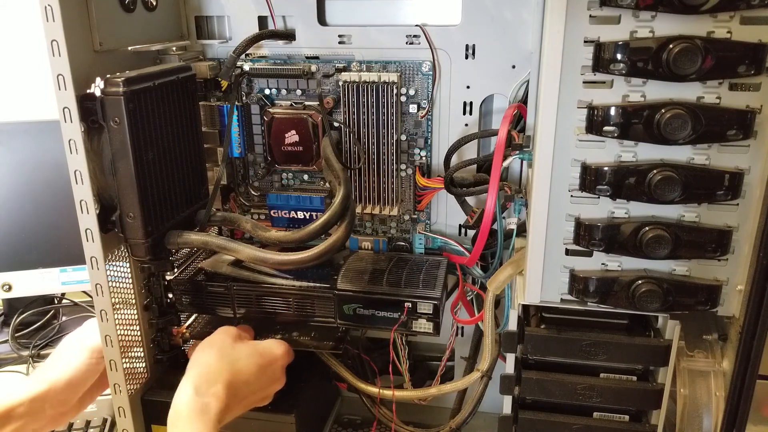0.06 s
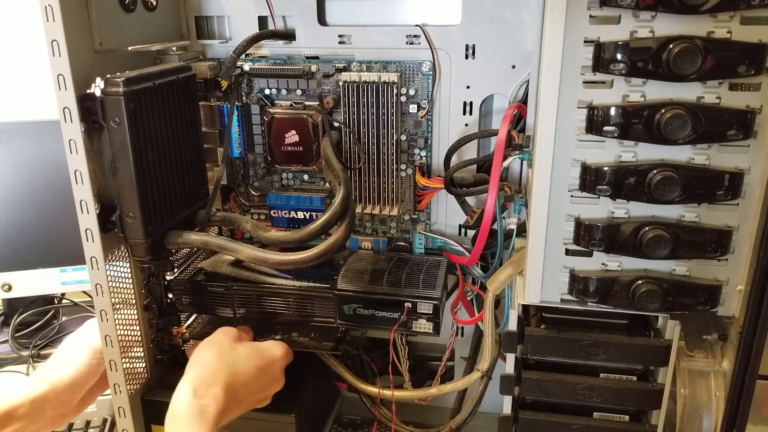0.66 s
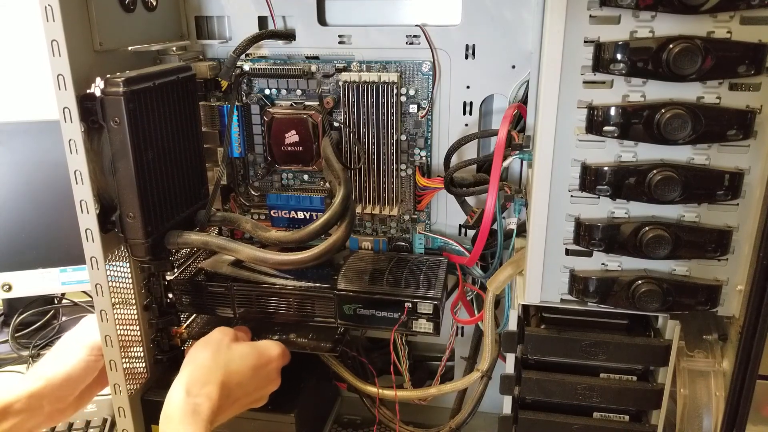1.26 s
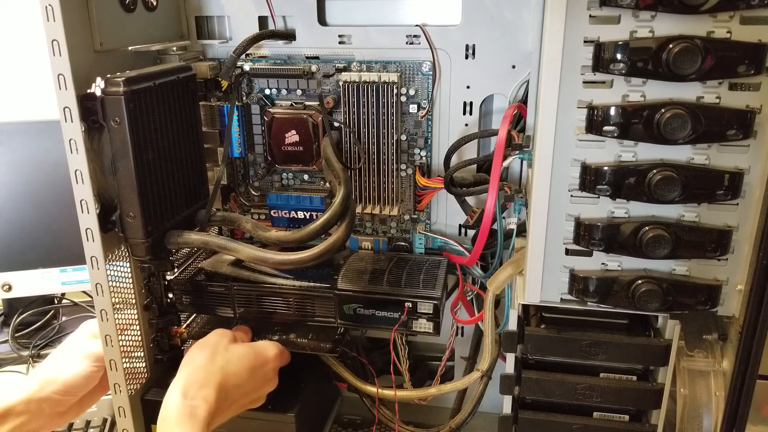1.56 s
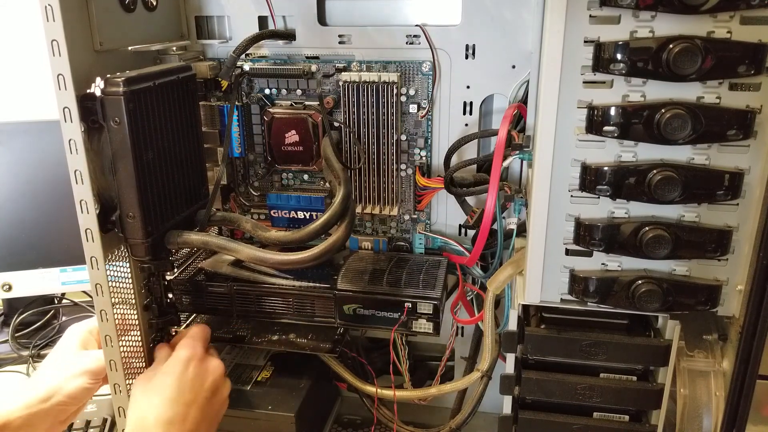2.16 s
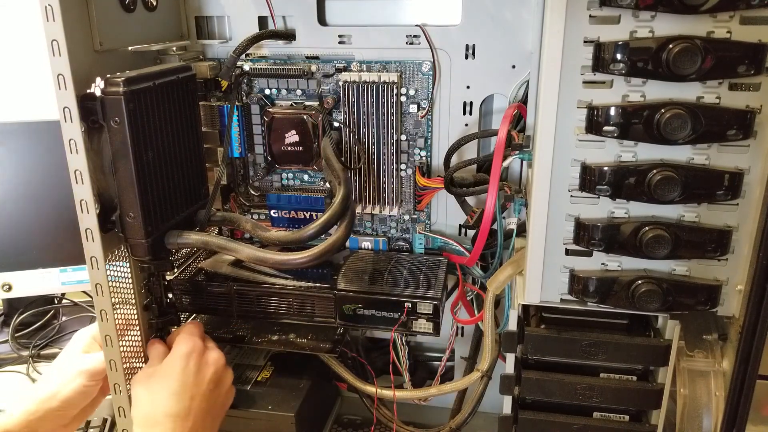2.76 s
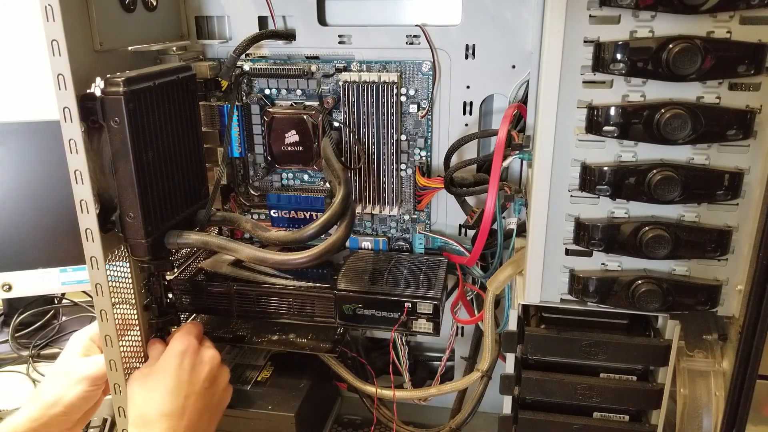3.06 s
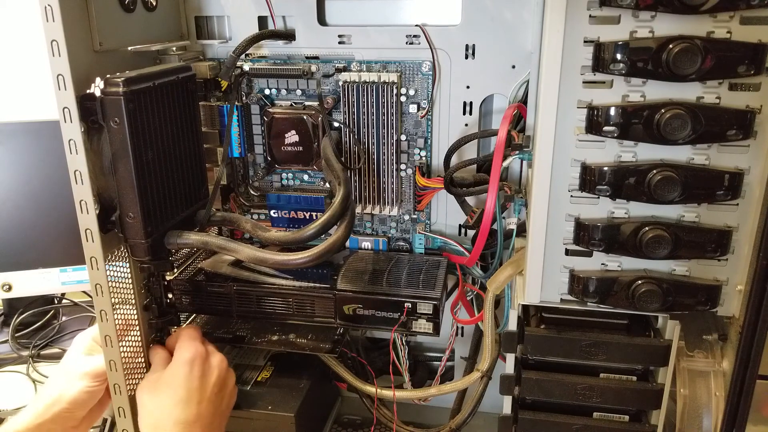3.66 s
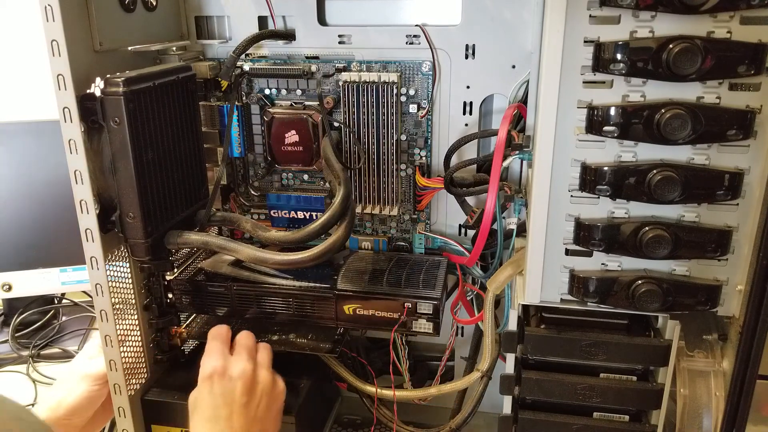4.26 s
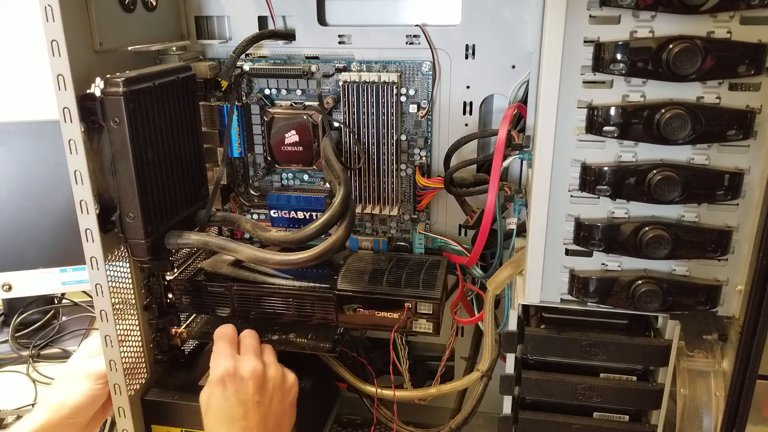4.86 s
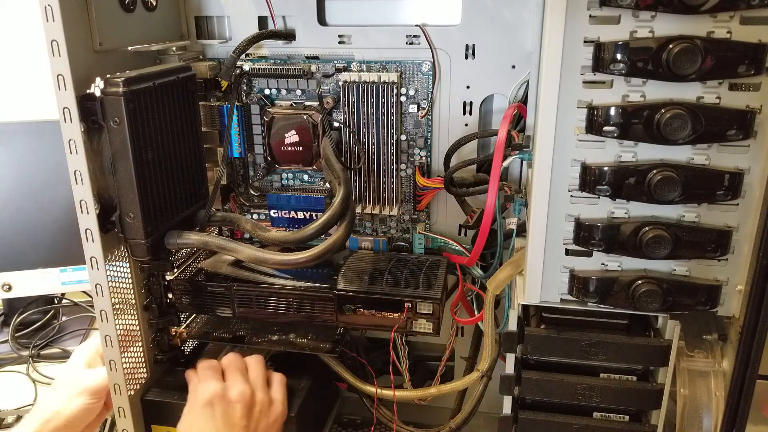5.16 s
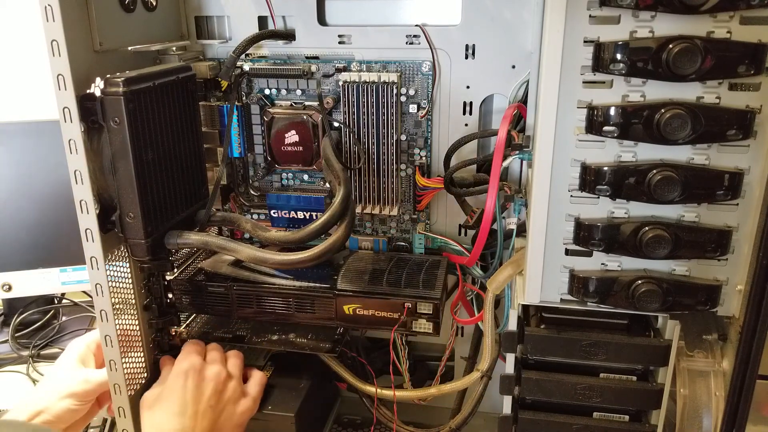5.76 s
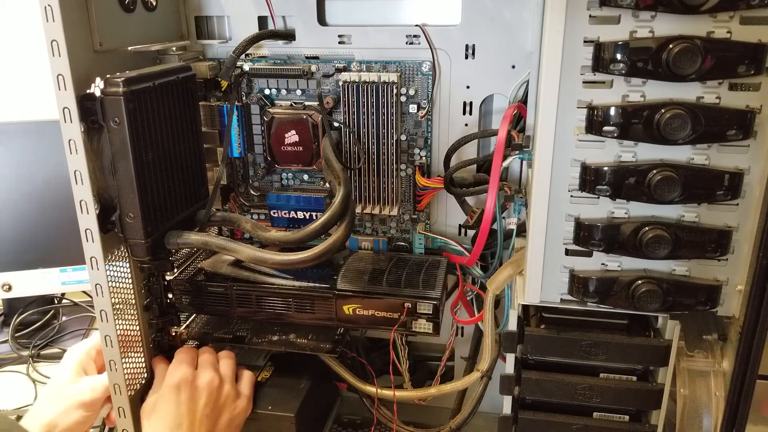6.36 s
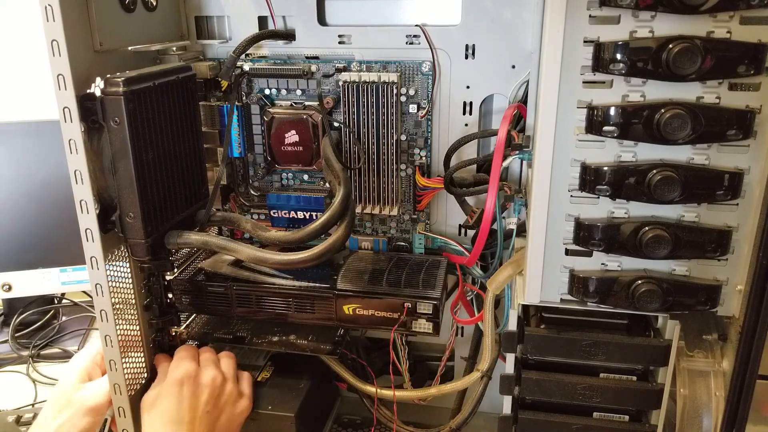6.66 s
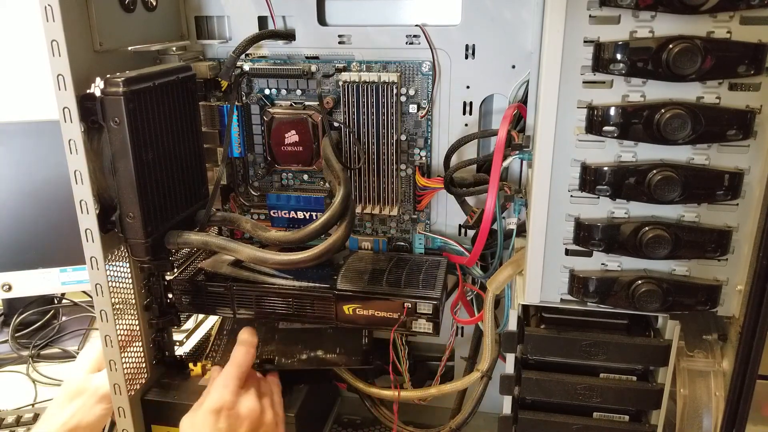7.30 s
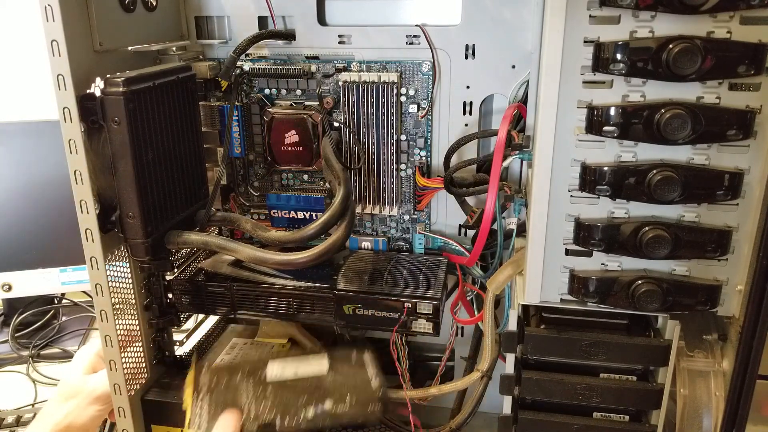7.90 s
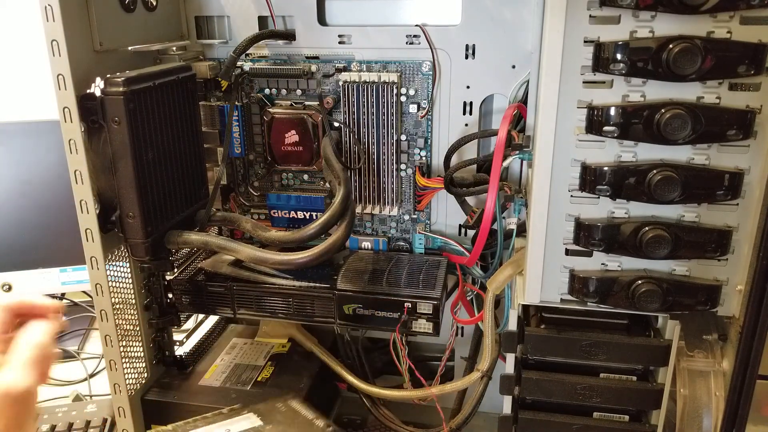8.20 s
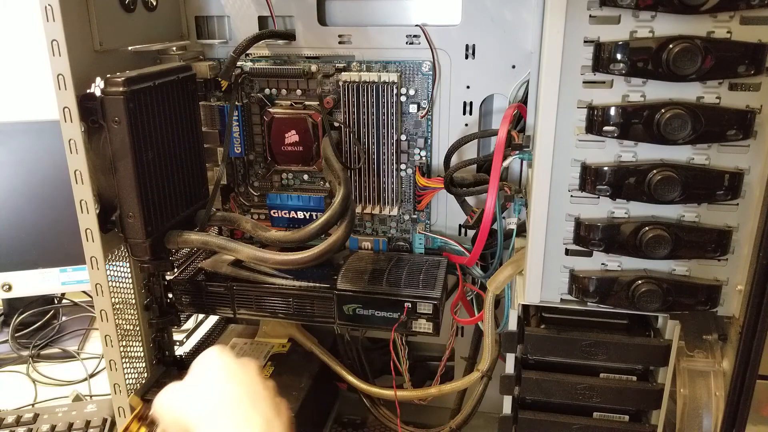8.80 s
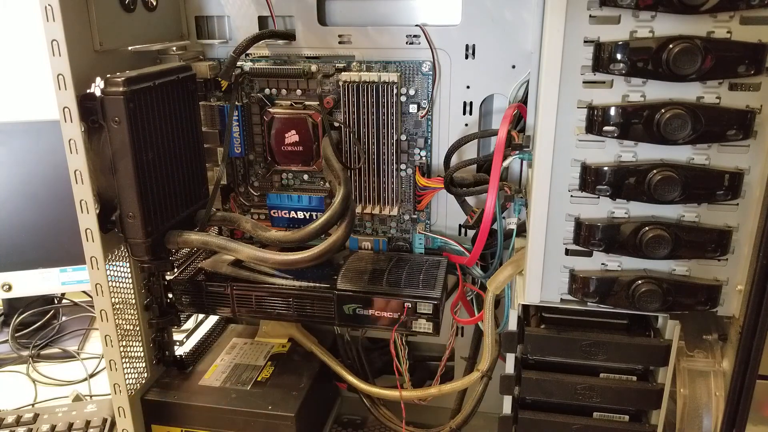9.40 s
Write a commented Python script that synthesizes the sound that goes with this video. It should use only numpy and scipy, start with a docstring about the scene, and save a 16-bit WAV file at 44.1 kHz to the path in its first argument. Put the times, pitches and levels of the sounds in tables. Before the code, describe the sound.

Hands unscrew and pull a card from a metal computer case, with light scrapes, knocks and clacks over a low hum in a quiet room.

```python
"""An open steel computer case in a small, quiet room, on a close pair of microphones, hands a little left.
First a screw rasps round in six twists and the expansion card knocks. Fingers then rub on its bracket
and plastic shroud. Near 7 s the card slides from its slot, the case clanks, the bracket scrapes and the
card knocks on its way out; plastic clacks come last. Each contact rings the part and the room, and a
longer, softer one loses treble. A fan hums low throughout, over moving air and microphone hiss."""
import sys
import numpy as np
from scipy import signal
from scipy.fft import rfft, irfft
from scipy.io import wavfile
from scipy.ndimage import uniform_filter1d

SR = 44100
rng = np.random.default_rng(int(sys.argv[2]) if len(sys.argv) > 2 else 0)


def store_pcm(level_fs):
    """Save levels as 16-bit WAV."""
    pcm = np.round(np.clip(level_fs, -1, 1) * 32767).astype(np.int16)
    wavfile.write(sys.argv[1], SR, np.atleast_2d(pcm).T)


N = 420713

# blows on steel case, card and plastic parts: (time [s], level [dB], contact time [ms], extra thud [dB])
CASE_BLOWS = [(6.0005, -41, 0.025, -2), (6.014, -41, 0.55, 8), (6.783, -28.5, 0.16, -6),
              (6.7905, -42, 0.055, 5.5)]
CARD_KNOCKS = [(0.7975, -41.5, 0.15, 0), (0.8055, -38, 0.76, 5.5), (0.862, -56.5, 0.89, 22),
               (1.079, -56, 2.8, 4), (2.213, -60, .5, 9), (5.824, -60.5, 1.6, 9), (6.252, -56, 1.3, -8),
               (7.1335, -33, 0.35, -9), (7.1795, -44.5, 0.11, 7), (7.232, -51.5, 0.1, 11.5),
               (7.638, -52, 0.098, 8), (8.9, -66.5, 0.79, 4)]
PLASTIC_CLACKS = [(2.035, -55.5, 0.25, -6), (5.6445, -43, 0.1, -12), (9.464, -53, 0.044, 12.5),
                  (9.533, -42.5, 0.33, 16)]
# taps on the card's metal bracket: (time [s], level [dB], contact time [ms])
BRACKET_TAPS = [(1.978, -62.5, .03), (2.168, -69, .05), (5.728, -62, 0.16), (6.515, -82, .1),
                (7.071, -48, 0.049), (8.036, -72, 0.29), (8.089, -73, .12), (8.612, -63, 0.097)]
# thin ticks under the fingers: (time [s], level [dB])
TICKS = [(2.484, -80), (8.006, -78), (8.337, -65), (8.344, -57.5), (8.381, -69.5)]
# screw twists, rubs on case and shroud: (time [s], length [s], level [dB], contact time [ms])
SCREW_TWISTS = [(0.008, 0.038, -56.5, 0.16), (0.153, 0.045, -54, 0.15), (0.319, 0.035, -57.5, 0.25),
                (0.467, 0.04, -63.5, 0.19), (0.598, .044, -57, 0.17), (0.712, .068, -58.5, 0.22)]
CASE_RUBS = [(1.52, 0.12, -61, 0.21), (1.65, 0.19, -62.5, 0.15), (1.88, 0.13, -73, 0.063),
             (1.99, 0.043, -55, 0.11), (2.125, 0.11, -62.5, 0.14), (2.23, 0.22, -72, 0.14),
             (5.83, 0.046, -73, 0.048), (6.368, .018, -67.5, .04), (7.605, 0.018, -65.5, .05)]
SHROUD_RUBS = [(2.62, 0.065, -64, 0.13), (4.24, 0.045, -67, 0.058), (4.925, 0.11, -65.5, 0.12),
               (5.105, 0.1, -60, 0.11), (8.607, .025, -64, .06)]
# connector leaving its slot, bracket dragging, skin brushing: (time [s], length [s], level [dB])
SLOT_SLIDE = [(6.721, 0.048, -37.5)]
BRACKET_SCRAPE = [(7.072, 0.025, -42.5)]
SWISHES = [(1.735, 0.048, -70), (2.125, 0.038, -70), (2.478, 0.021, -74), (3.79, 0.032, -74.5),
           (3.87, 0.081, -76), (4.2, 0.03, -83.5), (5.24, 0.13, -81), (5.41, 0.11, -79), (7.28, 0.27, -78),
           (8.0, 0.056, -80.5), (8.175, 0.044, -73), (8.56, 0.022, -77)]
# ringing modes of each part: (frequency [Hz], level [dB], t60 [s])
CASE_MODES = [(444, -11, .26), (480, -17, 0.18), (521.4, -3.5, .2), (913, -9.5, .2), (1199, -10, .15),
              (1664, -16, 0.34), (1778, -9.5, 0.067), (2050, -13, 0.28), (2420, -16.5, 0.086),
              (2710, -9.5, 0.14), (2994, -12, .2), (3760, -7, .24), (4810, -11, .2), (6600, -13.5, 0.18),
              (6760, -13, 0.25)]
CARD_MODES = [(107.5, -19.5, .2), (183.3, -13, .18), (403, -8.5, .14), (478, -6.5, .12), (570, -1.5, 0.15),
              (811, -7, 0.11), (940, -8, 0.14), (1124, -13.5, 0.23)]
SLOT_MODES = [(2100, -16, .05), (3782, -14, .1), (5030, -10, .1), (8350, -5, .12), (13400, -5, .1),
              (14070, -1, .13)]
BRACKET_MODES = [(1500, -10, .06), (2342, -2, .13), (3620, 1, .13), (4670, -12, .08), (6650, -6, .06),
                 (10100, -12, .06)]
PLASTIC_MODES = [(517, -7.5, 0.14), (810, -9, 0.21), (1190, -7.5, 0.16), (1280, 0, 0.2), (1480, -3.5, .18),
                 (1522, -7, 0.093), (2460, -13.5, 0.26), (2560, -19, 0.094)]
PANEL_MODES = [(451.2, -13.5, 0.073), (735, -11.5, 0.017), (1928, -0.5, 0.021), (2850, -6, 0.056),
               (3110, -18, 0.054), (2292, -8.5, 0.026), (3680, -7, .07), (4157, -5.5, 0.051),
               (4390, -4, .05), (4775, -7, 0.033), (5550, -5.5, 0.046), (7070, -10, 0.062)]
SHROUD_MODES = [(647, -1.5, 0.081), (800, -3.5, .12), (988, -8, 0.086), (1404, -6, 0.077),
                (2900, -4, 0.082), (7200, -15, .06), (9840, 8, 0.055)]
# edges of the thud, body, clack, click and tick bands: (frequency [Hz])
BAND_EDGES = [70, 300, 1000, 3200, 8000, 15800]
# tone of each kind of contact: (thud [dB], body [dB], clack [dB], click [dB], tick [dB])
CASE_TONE = (-13, 1.5, 7, 4.5, 6)
CARD_TONE = (-8.5, 1.5, -4.5, -9.5, -7)
SLIDE_TONE = (-8, -6, 0, 1, -1)
BRACKET_TONE = (-16.5, -4.5, -0.5, 2.5, -4)
SCRAPE_TONE = (-20, -9.5, 5, -5.5, -10)
PLASTIC_TONE = (-13, -4.5, 0.5, -16, -19.5)
SCREW_TONE = (-1.5, 1.5, -1.5, -6.5, -1)
RUB_TONE = (-13, -1, 0, -4, -3.5)
SHROUD_TONE = (-13, -0.5, -6.5, -10.5, -4)
SWISH_TONE = (-17, -12.5, -2, 2.5, 6)
TICK_TONE = (-30, -37, -12, -0.5, 3.5)
# fan hum: (harmonic [multiple of the shaft rate], level [dB])
FAN_HARMONICS = [(3, -66.5), (4, -65), (5, -60.5), (6, -60), (9, -76), (10, -69), (13, -76), (14, -75.5),
                 (16, -81.5), (18, -79.5)]
# moving air and microphone hiss: (frequency [Hz], level [dB per Hz])
AIR_SPECTRUM = [(20, -88.5), (50, -88.5), (85, -83.5), (150, -84.5), (230, -89.5), (320, -92.5), (480, -94),
                (640, -103), (1000, -113), (2000, -117.5), (5000, -120), (8500, -119), (13000, -113.5),
                (16000, -113.5)]

RING_SAMPLES = 32768
LEFT_RIGHT = np.array([[1], [-1]])


def case_clanks():
    """The steel case rings when struck, loudest as the card snaps free."""
    return blows(CASE_BLOWS, CASE_TONE, CASE_MODES, crack_db=4, ring_db=-7.5, t60=.28)


def card_knocks():
    """The card bumps on its way out; its low modes make a duller knock."""
    return blows(CARD_KNOCKS, CARD_TONE, CARD_MODES, crack_db=3, ring_db=-6.5, t60=.24)


def slot_slide():
    """The edge connector leaves its slot in a burst of very uneven slips."""
    return strokes(SLOT_SLIDE, SLIDE_TONE, SLOT_MODES, ring_db=-4.5, t60=.11,
                   slips_per_s=1300, uneven_db=11, hiss=.12, swell=.14)


def bracket():
    """The metal bracket rings under light taps and drags once along the case."""
    taps = blows(BRACKET_TAPS, BRACKET_TONE, BRACKET_MODES, crack_db=4, ring_db=-6, t60=.25)
    scrape = strokes(BRACKET_SCRAPE, SCRAPE_TONE, BRACKET_MODES, ring_db=5, t60=.26,
                     slips_per_s=2200, uneven_db=4, hiss=.14, swell=.1)
    return taps + scrape


def plastic_clacks():
    """The card's plastic parts ring hollow, with little crack."""
    return blows(PLASTIC_CLACKS, PLASTIC_TONE, PLASTIC_MODES, crack_db=-7.5, ring_db=-11, t60=.33)


def screw(catch_share=.55, catch_db=-5):
    """Each twist rasps in the thread, which catches once partway and taps the bracket."""
    rasps = strokes(SCREW_TWISTS, SCREW_TONE, PANEL_MODES, ring_db=0, t60=.32,
                    slips_per_s=500, uneven_db=7, hiss=.066, swell=.18)
    catches = [(time + catch_share * length, db + catch_db, contact_ms)
               for time, length, db, contact_ms in SCREW_TWISTS]
    return rasps + blows(catches, BRACKET_TONE, BRACKET_MODES, crack_db=-1, ring_db=-18, t60=.23)


def finger_rubs():
    """Fingers and card rub the case; skin drags on the hollow shroud and brushes metal and plastic."""
    case = strokes(CASE_RUBS, RUB_TONE, PANEL_MODES, ring_db=-1, t60=.3,
                   slips_per_s=380, uneven_db=6, hiss=.09, swell=.16)
    shroud = strokes(SHROUD_RUBS, SHROUD_TONE, SHROUD_MODES, ring_db=-3, t60=.33,
                     slips_per_s=230, uneven_db=-1, hiss=.048, swell=.25)
    swishes = strokes(SWISHES, SWISH_TONE, PANEL_MODES, ring_db=-11, t60=.43,
                      slips_per_s=300, uneven_db=7, hiss=.13, swell=.1)
    return case + shroud + swishes


def finger_ticks(extra_left_db=3):
    """Instant contacts too light to move anything but the treble, heard further left."""
    rows = [(time, db, 0) for time, db in TICKS]
    sound = blows(rows, TICK_TONE, PANEL_MODES, crack_db=4, ring_db=-8, t60=.24)
    return sound * amp(LEFT_RIGHT * extra_left_db / 2)


def blows(rows, tone, modes, crack_db, ring_db, t60, crack_fall_db_per_ms=10):
    """Single impacts on one part; the longer the contact, the weaker the opening crack."""
    out = np.zeros((2, N))
    for time, db, contact_ms, *thud_db in rows:
        sound = response(modes, crack_db - crack_fall_db_per_ms * contact_ms, ring_db, t60)
        levels_db = contact_levels(tone, db, contact_ms, *thud_db)
        add(out, time, voiced(sound, levels_db, seconds=.04))
    return out


def strokes(rows, tone, modes, ring_db, t60, slips_per_s, uneven_db, hiss, swell, grip_s=.005):
    """Sliding contact: a hail of tiny slips over a smooth hiss drives the part while the hand moves."""
    out = np.zeros((2, N))
    for time, length, *contact in rows:
        size = int(length * SR)
        slipping = rng.random(size) < slips_per_s / SR
        direction, strength, grain = rng.standard_normal((3, size))
        slips = slipping * np.sign(direction) * amp(uneven_db * np.clip(strength, -2, 2))
        pressure = np.sin(np.pi * (np.arange(size) + .5) / size) ** swell
        grip = 1 - np.exp(-np.arange(size) / SR / grip_s)
        force = (slips + hiss * grain) * pressure * grip
        part = response(modes, crack_db=-1.5, ring_db=ring_db, t60=t60)
        sound = signal.fftconvolve([force], part)[:, :RING_SAMPLES]
        add(out, time, voiced(sound, contact_levels(tone, *contact), size / SR))
    return out


def response(modes, crack_db, ring_db, t60, crack_t60=.014):
    """One contact sets off a crack, the part's modes, and case and room reflections lasting t60 seconds."""
    t = np.arange(RING_SAMPLES) / SR
    fade = lambda seconds: np.exp(-np.log(1000) * t / seconds)
    rise = lambda seconds: 1 - np.exp(-t / seconds)
    crack = amp(crack_db + 9.5) * rng.standard_normal(RING_SAMPLES) * fade(crack_t60)
    reflections = diffuse(RING_SAMPLES, apart_hz=3000, bass_spread=.22) * fade(t60) * rise(.003)
    ring = 0
    for hz, db, decay in modes:
        # the shorter the wave, the more its phase differs between the microphones
        phase = rng.uniform(0, 2 * np.pi) + min(hz / 2500, 1) * rng.standard_normal((2, 1))
        ring = ring + amp(db + ring_db) * fade(decay) * np.sin(2 * np.pi * hz * t + phase)
    return rise(.0008) * (crack + ring) + reflections


def contact_levels(tone, level_db, contact_ms=0, thud_db=0):
    """Band levels: the tone falls 12 dB an octave above one over the contact time."""
    centres_khz = np.sqrt(np.multiply(BAND_EDGES[:-1], BAND_EDGES[1:])) / 1000
    softness_db = 10 * np.log10(1 + (centres_khz * contact_ms) ** 4)
    thud, *rest = np.array(tone) + level_db - softness_db
    return [thud + thud_db] + rest


def voiced(x, levels_db, seconds):
    """Strength and hardness of a contact: a filter steers each band's opening seconds to its level."""
    hz = np.fft.rfftfreq(RING_SAMPLES, 1 / SR)
    size = int(seconds * SR)
    opening = rfft(x[:, :size], RING_SAMPLES)
    power = np.mean(np.abs(opening) ** 2, axis=0) * 2 / (size * RING_SAMPLES)
    points = []
    for lo, hi, db in zip(BAND_EDGES, BAND_EDGES[1:], levels_db):
        lift_db = db - 10 * np.log10(power[(hz >= lo) & (hz < hi)].sum())
        points += [(lo * (hi / lo) ** share, lift_db) for share in (.2, .8)]
    points = [(12, points[0][1] - 22)] + points  # the deep bass falls away
    # minimum phase, so nothing sounds ahead of the contact
    cepstrum = irfft(np.log(colour(points, hz)))
    cepstrum[1:RING_SAMPLES // 2] *= 2
    cepstrum[RING_SAMPLES // 2 + 1:] = 0
    return irfft(rfft(x) * np.exp(rfft(cepstrum)))


def at_microphones(x, left_db=1.25, lag_samples=7):
    """The hands work on the left: that microphone hears them first, louder and with more top."""
    panned = x * amp(LEFT_RIGHT * left_db / 2)
    tilt = colour([(200, -1.16), (5000, 1.0), (8000, -0.7), (12000, 3.0)], np.fft.rfftfreq(N, 1 / SR))
    left, right = irfft(rfft(panned) * tilt ** LEFT_RIGHT, N)
    return np.array([left, np.pad(right, (lag_samples, 0))[:N]])


def fan(shaft_hz=29.62, wander_hz=.12, waver_db=2, drift_rad=.43):
    """One soft throb per shaft turn; harmonics waver and drift apart, so the flutter comes and goes."""
    turn = 2 * np.pi * np.cumsum(shaft_hz + wander_hz * walk(1.7, N)) / SR
    hum = 0
    for multiple, db in FAN_HARMONICS:
        quiver = .25 * walk(14, N)
        phase = multiple * turn + drift_rad * walk(2.6, N) + quiver
        gain = np.sqrt(2) * amp(db + waver_db * walk(9, N))
        hum = hum + gain * np.sin(phase + .9 * rng.standard_normal())
    return hum * amp(LEFT_RIGHT * .15 - 1)


def air():
    """Room tone: a low rush of air under faint microphone hiss."""
    gain = colour(AIR_SPECTRUM, np.fft.rfftfreq(N, 1 / SR)) * np.sqrt(SR / 2)
    return irfft(rfft(diffuse(N, apart_hz=2300, bass_spread=.48)) * gain, N)


def diffuse(size, apart_hz, bass_spread):
    """White noise at two close microphones: alike in the bass, unrelated in the treble."""
    mid, side = rfft(rng.standard_normal((2, size)))
    spread = np.clip(bass_spread + np.fft.rfftfreq(size, 1 / SR) / apart_hz, 0, 1)
    return irfft((mid + LEFT_RIGHT * spread * side) / np.sqrt(1 + spread ** 2), size)


def walk(rate_hz, size):
    """Smooth random drift with a spread near 1."""
    hold = int(SR / rate_hz)
    steps = np.repeat(rng.standard_normal(size // hold + 1), hold)
    return np.sqrt(2) * uniform_filter1d(uniform_filter1d(steps, hold), hold)[:size]


def colour(points, hz):
    """Gain at hz from (frequency [Hz], level [dB]) points joined on a log axis."""
    at, db = np.transpose(points)
    return amp(np.interp(np.log(hz + 1), np.log(at), db))


def amp(db):
    """Decibels to gain."""
    return 10 ** (np.asarray(db) / 20)


def add(out, time, x):
    """Mixes a sound in at a time in seconds."""
    start = int(time * SR)
    out[:, start:start + RING_SAMPLES] += x[:, :N - start]


def scene():
    """All the handling, as the microphones hear it, over the hum of the room."""
    parts = case_clanks() + card_knocks() + slot_slide() + bracket() + plastic_clacks()
    fingers = screw() + finger_rubs() + finger_ticks()
    return at_microphones(parts + fingers) + fan() + air()


def record(dry):
    """The recorder cuts the top steeply above 15850 Hz."""
    return signal.sosfilt(signal.ellip(10, .1, 80, 15850, fs=SR, output="sos"), dry)


dry = scene()
out = record(dry)
store_pcm(out)
```